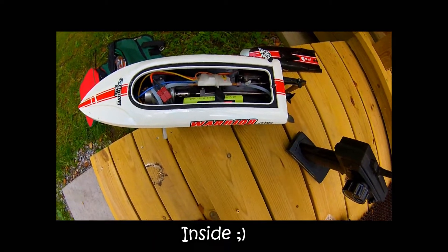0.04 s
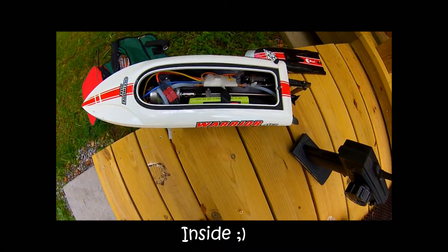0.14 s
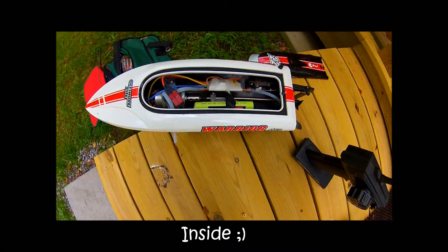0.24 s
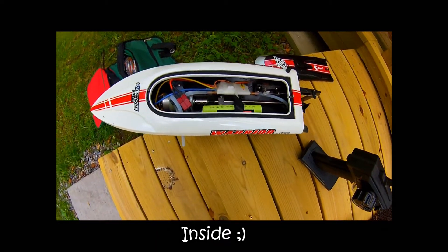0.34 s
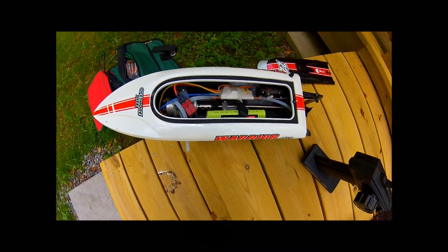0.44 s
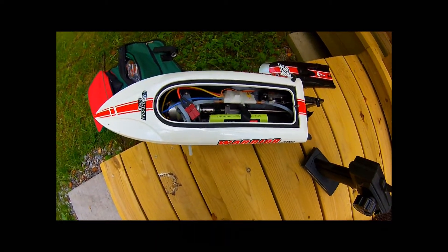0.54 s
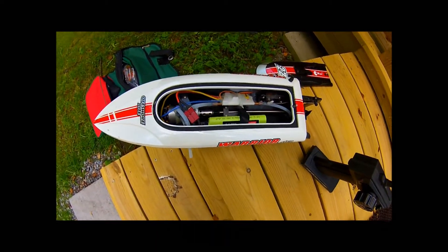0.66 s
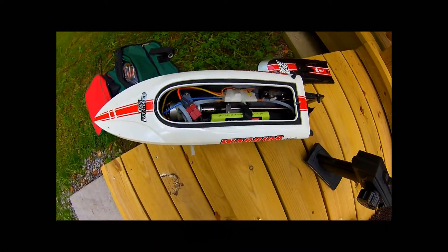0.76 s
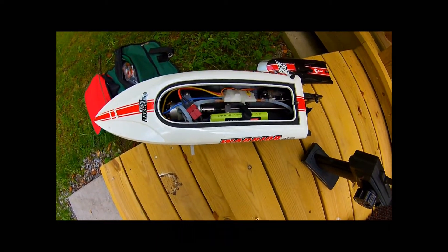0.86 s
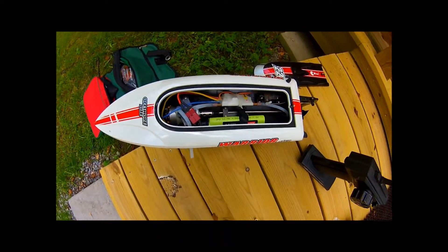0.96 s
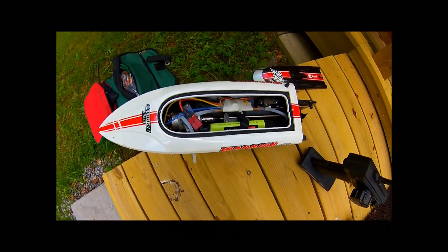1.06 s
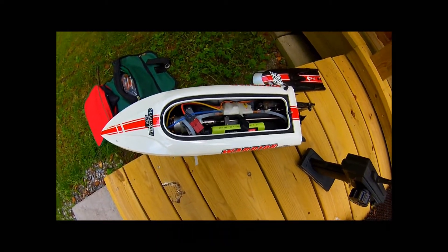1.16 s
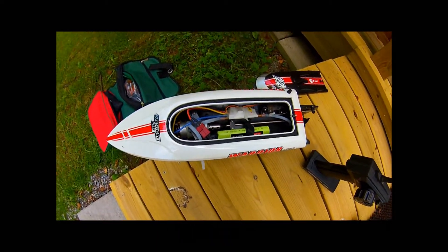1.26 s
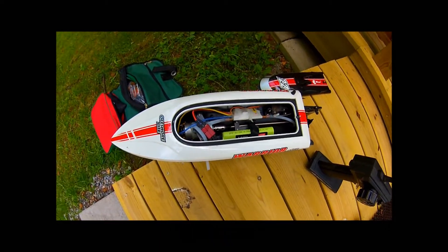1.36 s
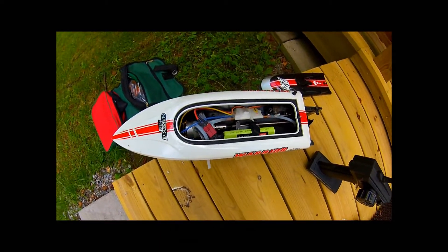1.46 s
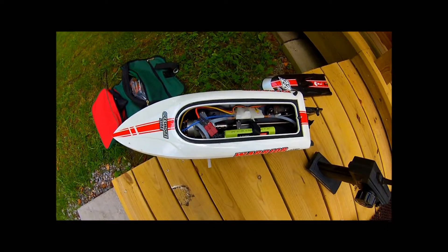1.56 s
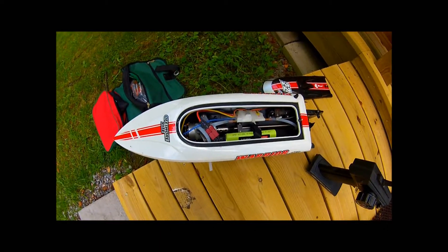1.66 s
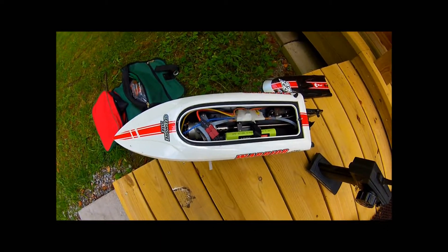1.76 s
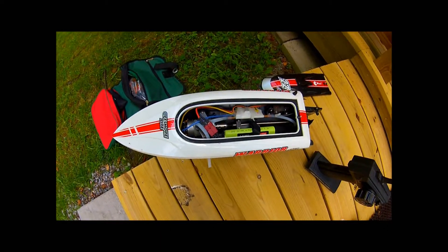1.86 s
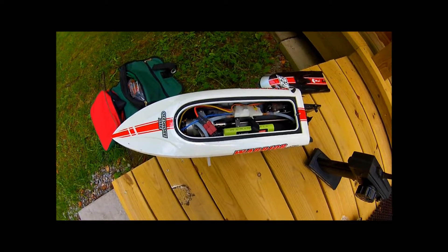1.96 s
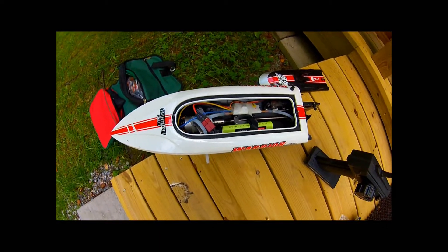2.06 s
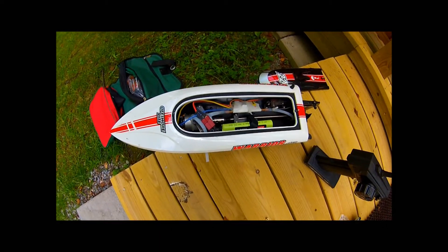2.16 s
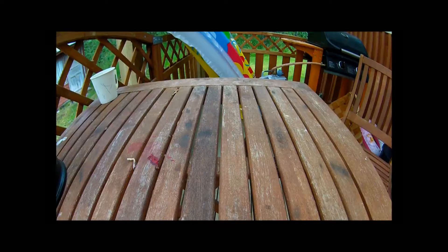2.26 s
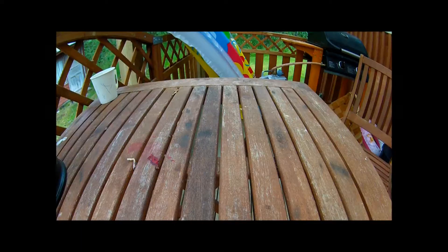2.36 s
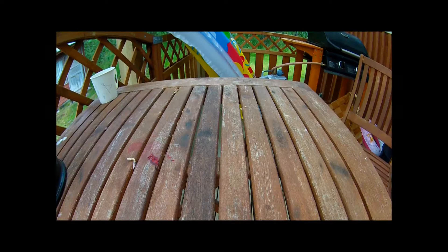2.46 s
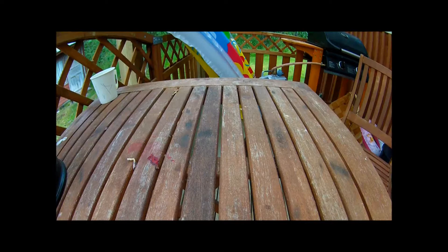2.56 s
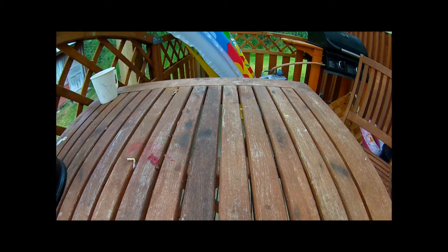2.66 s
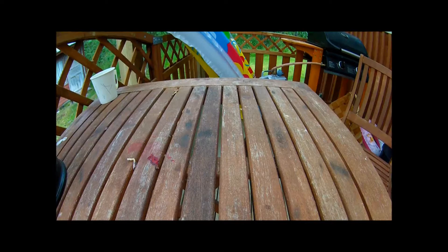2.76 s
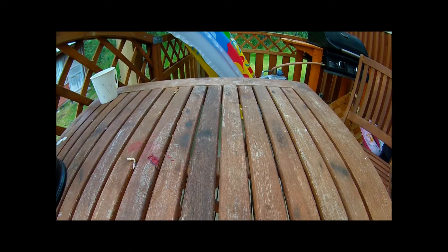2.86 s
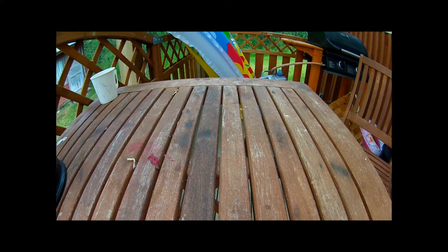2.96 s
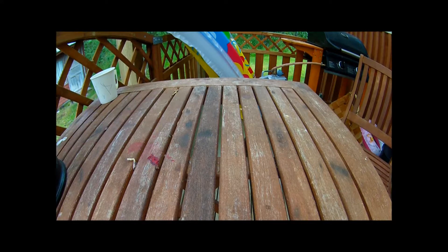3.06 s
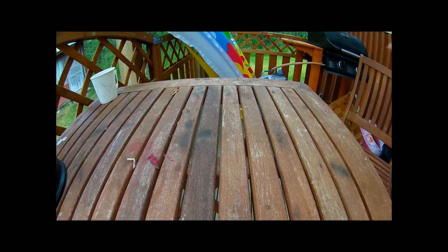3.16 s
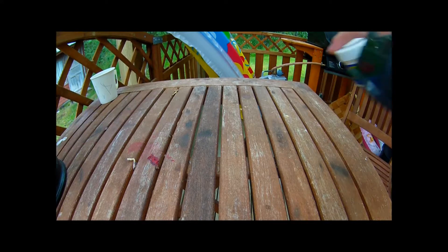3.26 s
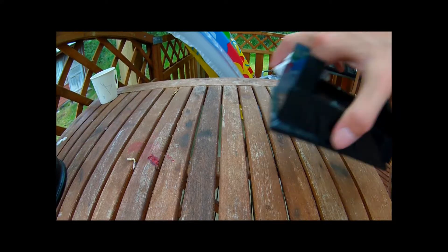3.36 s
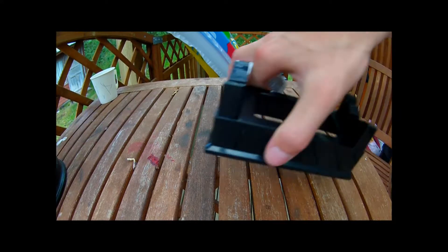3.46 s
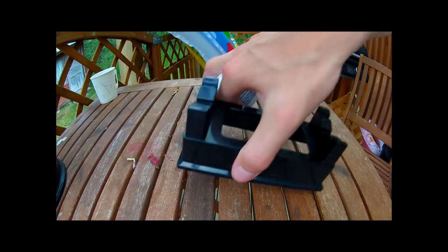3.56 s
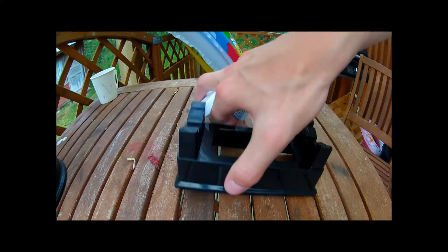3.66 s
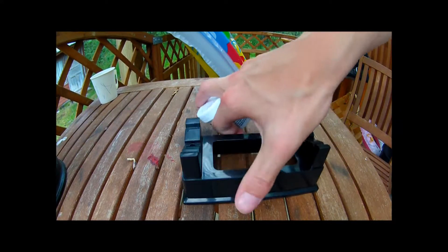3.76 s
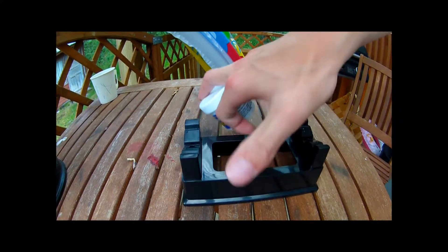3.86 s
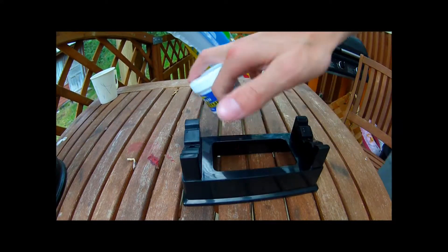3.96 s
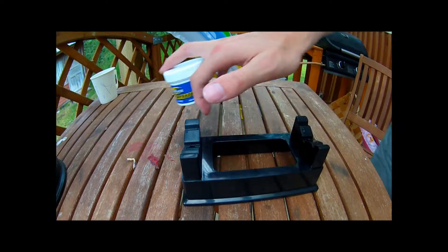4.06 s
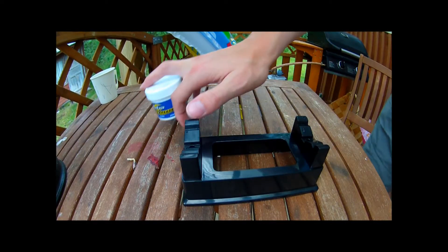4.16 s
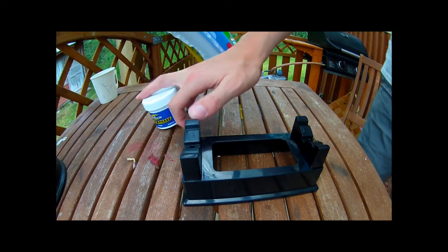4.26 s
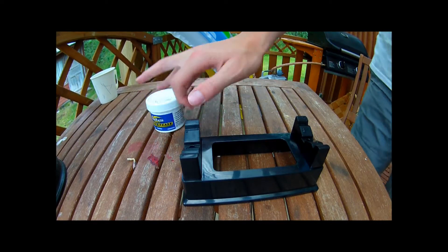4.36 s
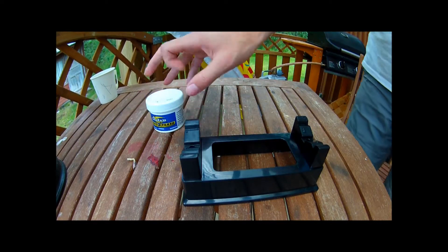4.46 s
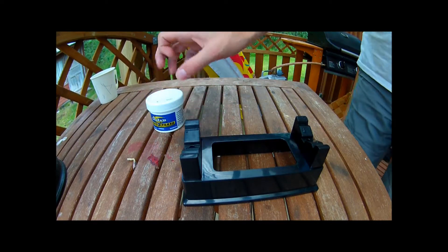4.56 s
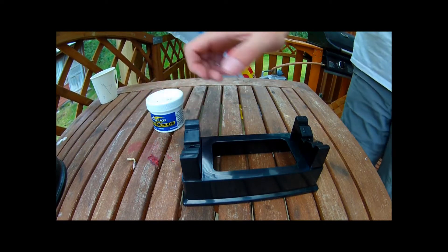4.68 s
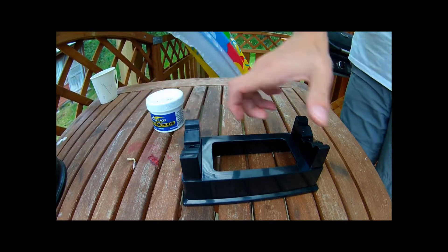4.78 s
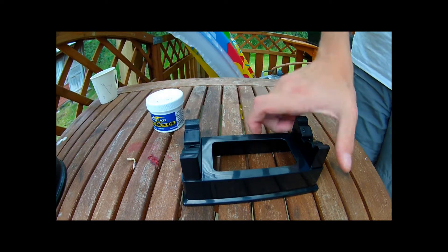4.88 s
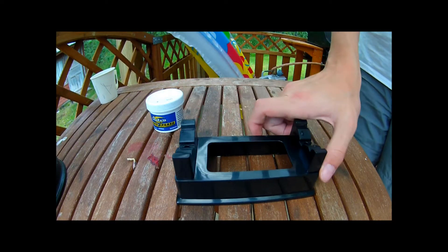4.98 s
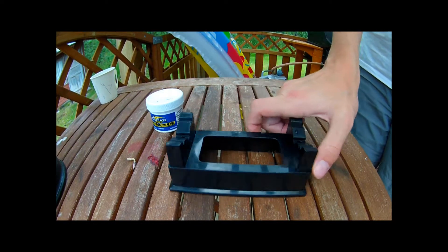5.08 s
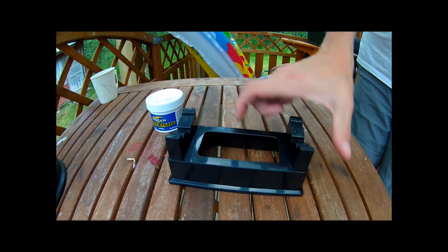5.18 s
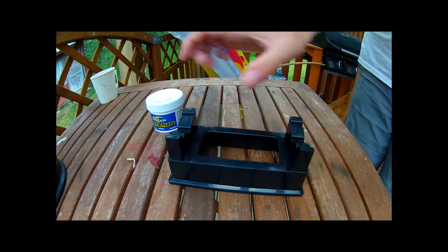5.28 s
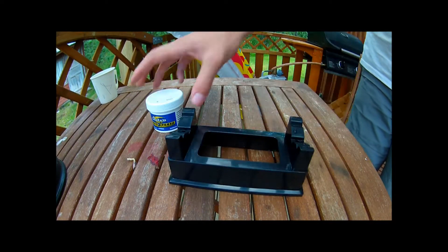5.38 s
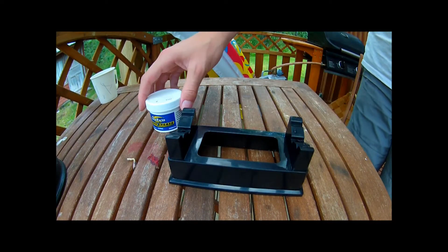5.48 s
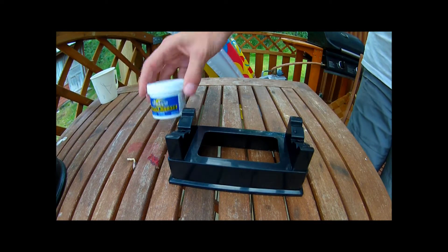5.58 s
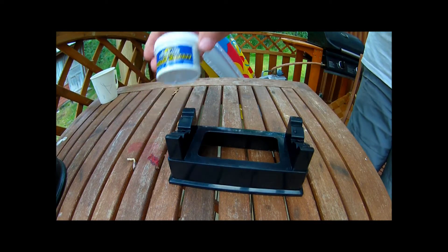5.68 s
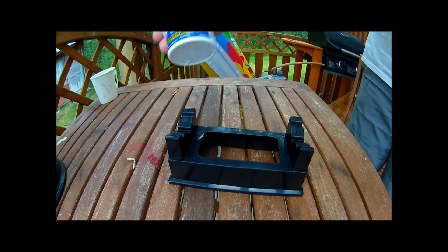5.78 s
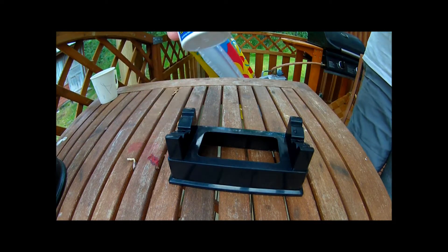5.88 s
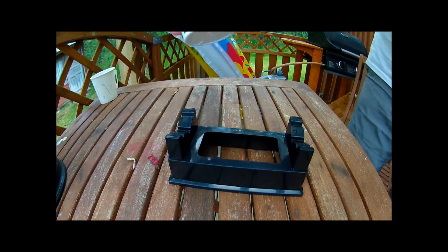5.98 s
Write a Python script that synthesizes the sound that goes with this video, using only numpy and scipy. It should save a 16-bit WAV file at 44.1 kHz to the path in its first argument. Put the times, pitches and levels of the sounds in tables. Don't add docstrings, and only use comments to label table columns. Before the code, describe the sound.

A cheap camera microphone at a deck table hears dull wind and distant traffic with tiny cloth rustles. Its own button clicks faintly, then snaps hard, followed by an instant of silence at a cut. Quiet returns before an empty plastic stand chatters loudly onto wooden slats, a little tub is set down with lighter knocks, and faint fingering and short sliding scrapes fade into open air.

```python
import sys
import numpy as np
from scipy import signal
from scipy.fft import rfft, irfft, next_fast_len
from scipy.io import wavfile
from scipy.ndimage import uniform_filter1d

SR = 44100
rng = np.random.default_rng(int(sys.argv[2]) if len(sys.argv) > 2 else 0)


def store_wav(level_fs):
    pcm = np.round(np.clip(np.atleast_2d(level_fs), -1, 1) * 32767)
    wavfile.write(sys.argv[1], SR, pcm.T.astype(np.int16))


def boost(x):
    u = np.asarray(x, float) / 20
    return 10 ** u


N = 265702
TIME = np.arange(N) / SR


def shaped(db_of_hz, channels):
    size = next_fast_len(N)
    hz = np.maximum(np.fft.rfftfreq(size, 1 / SR), 1)
    f, db = np.transpose(db_of_hz)
    gain = boost(np.interp(np.log(hz), np.log(f), db))
    spectrum = rfft(rng.standard_normal((channels, size)))
    x = irfft(spectrum * gain, size)[:, :N]
    return x / x.std()


def band(x, lo_hz, hi_hz):
    return signal.sosfilt(signal.butter(2, [lo_hz, hi_hz], "bandpass", fs=SR, output="sos"), x)


def walk(rate):
    hold = int(SR / rate)
    x = np.repeat(rng.standard_normal(N // hold + 1), hold)
    x = uniform_filter1d(uniform_filter1d(x, hold), hold)[:N]
    return x / x.std()


def add(out, s, y):
    i = int(s * SR)
    out[i:i + len(y)] += y[:N - i]


def ring(modes, scatter_db, detune, dense_db, dense_t60):
    hz, db, t60 = np.transpose(modes)[:, :, None]
    t = TIME[:SR // 6]
    chance = rng.standard_normal((2, len(hz), 1))
    polarity = (-1.) ** np.arange(len(hz))[:, None]
    decay = boost(db + scatter_db * chance[0] - 60 * t / t60)
    tones = np.sin(2 * np.pi * hz * (1 + detune * chance[1]) * t)
    y = np.sum(polarity * decay * tones, axis=0)
    blur = rng.standard_normal(len(t)) * boost(-60 * t / dense_t60)
    y = band(y, 0.4 * hz.min(), 1.42 * hz.max())
    blur = band(blur, 0.812 * hz.min(), 1.13 * hz.mean())
    y = y / np.linalg.norm(y) + boost(dense_db) * blur / np.linalg.norm(blur)
    return y / np.linalg.norm(y)


def outdoors():
    # f/Hz, density/dB per Hz
    air_colour = [(6, -3), (15, 6.5), (40, 4.5), (65, -5), (110, -11), (200, -15.5), (400, -21.5),
                  (800, -23.5), (1300, -27), (2000, -32.5), (4000, -33), (5900, -39)]
    # t/s, level/dB
    traffic_course = [(0, 1), (.7, -0.35), (3.5, .3), (4.0, -2.5), (5.0, -2.5), (6.02, -2.5)]
    # start/s, end/s, f/Hz, level/dB
    whines = [(.87, .92, 3400, -57), (3.26, 3.4, 3750, -60.5), (1.2, 1.326, 1495, -55.5),
              (2.225, 2.42, 355, -54.5), (2.227, 2.357, 780, -60), (2.639, 2.843, 360, -52),
              (2.607, 2.72, 717, -58), (2.78, 2.86, 720, -56), (2.969, 3.324, 290, -56.5),
              (3.006, 3.21, 900, -63), (2.994, 3.25, 880, -57), (3.45, 3.625, 420, -58)]
    base_db = (-49, -56 + np.interp(TIME, *np.transpose(traffic_course)), -65)
    lo_edges_hz, hi_edges_hz = (6, 130, 1500), (130, 1500, 7000)
    raise_db, flickers_db, rates_hz = (8, 3.0, 2.5), (2.5, 1.2, .8), (9, 12, 20)
    swell, out = walk(1.0), 0
    layers = zip(shaped(air_colour, channels=3), base_db, lo_edges_hz, hi_edges_hz,
                 raise_db, flickers_db, rates_hz)
    for air, db, lo_hz, hi_hz, above_db, flicker_db, rate in layers:
        layer = band(air, lo_hz, hi_hz)
        wander_db = 0.58 * swell + flicker_db * walk(rate)
        out = out + layer / layer.std() * boost(db + above_db + wander_db)
    waver = walk(15) + 0.1 * walk(400)
    for start, end, hz, db in whines:
        t = TIME[:int((end - start) * SR)]
        bend = 2.02 * hz / 350 * waver[int(start * SR):][:len(t)]
        whine = np.sqrt(np.hanning(len(t))) * np.sin(2 * np.pi * hz * t + bend)
        add(out, start, boost(db) * whine)
    return out


def rustles():
    # t/s, peak/dB, rise/ms, length/ms
    puffs = [(.1, -47.5, 31, 75), (.369, -60, 4, 18), (.565, -49, 9, 20), (1.168, -47.5, 11, 51),
             (1.26, -46.5, 24, 52), (2.517, -40, 3.0, 25), (2.812, -45.5, 3.7, 17), (3.084, -43, 6.5, 26),
             (3.257, -47, 24, 110), (5.257, -49.5, 3.7, 29), (5.649, -54, 4.6, 14)]
    # f/Hz, density/dB per Hz
    cloth_colour = [(120, -30), (200, -10), (773, -1.5), (927, -4), (1370, -4), (1740, -12), (3740, -11),
                    (5600, -19.5), (7280, -55), (12300, -120)]
    envelope, t = np.zeros(N), TIME[:SR // 3]
    for s, db, rise_ms, length_ms in puffs:
        puff = np.minimum(1000 * t / rise_ms, 1) * np.exp(-1000 * t / length_ms)
        add(envelope, s, boost(db - 6) * puff)
    crackle = boost(2.5 * walk(300))
    return envelope * crackle * shaped(cloth_colour, channels=1)[0]


def button():
    # f/Hz, level/dB, t60/s
    case_modes = [(560, -0.5, .018), (800, -11, 0.013), (1225, -1, 0.014), (1515, -3, 0.018),
                  (1835, -6.5, 0.0088), (2140, -7, 0.014), (2457, -5, 0.014), (3110, -22.5, 0.049),
                  (3870, -14.5, 0.0041), (4740, 4.5, 0.0068)]
    # t/s, peak/dB, push/ms
    snaps = [
        (1.9214, -23, 0.22),
        (1.9250, -19.5, 0.2),
        (2.0225, -30.5, 0.26),
        (2.0256, 0, .3),
        (2.0266, 5.5, .08),
    ]
    out = np.zeros(N)
    for s, db, push_ms in snaps:
        push = np.hanning(int(push_ms * SR / 1000) + 3)
        y = np.convolve(push, ring(case_modes, scatter_db=1.3, detune=0.012, dense_db=-2.0, dense_t60=0.014))
        add(out, s, y * boost(db) / np.abs(y).max())
    return out


def taps():
    # t/s, f/Hz, peak/dB, push/ms, t60/s
    soft_contacts = [(2.0231, 110, -12, 3.1, 0.013), (4.195, 227, -35, 4, .04),
                     (4.218, 217, -18.5, 4, 0.061), (4.363, 1400, -21.5, 3.4, 0.078),
                     (4.402, 1400, -19, 1.7, 0.062), (4.364, 2356, -25, 1.5, 0.056),
                     (4.216, 2855, -16, 0.94, 0.014), (4.196, 770, -26, 2.6, 0.04),
                     (4.596, 1135, -33, 4.9, 0.081), (4.63, 1138, -44, 38, 0.17),
                     (4.768, 1170, -38.5, 2.2, 0.22), (4.778, 715, -40.5, 14, 0.13),
                     (4.861, 1300, -41, 4, 0.12), (4.919, 669, -25, 12, 0.043),
                     (4.961, 658.5, -22, 6.9, 0.11), (4.963, 476, -32.5, 3, 0.48),
                     (5.50, 677, -56, 5.9, 0.083)]
    # t/s, f/Hz, peak/dB
    table_thuds = [(3.625, 89, -23), (3.711, 72.7, -19), (3.75, 113, -23), (4.217, 87.5, -22),
                   (4.364, 92, -24), (4.411, 70, -24.5)]
    thud_push_ms, thud_t60_s = 5.3, 0.17
    out, t = np.zeros(N), TIME[:SR // 4]
    for s, hz, db, push_ms, t60 in soft_contacts + [(*thud, thud_push_ms, thud_t60_s) for thud in table_thuds]:
        rise = np.sin(np.pi / 2 * np.minimum(1000 * t / push_ms, 1))
        fall = boost(-60 * np.maximum(t - push_ms / 1000, 0) / t60)
        wobble = 0.58 * np.sin(2 * np.pi * 45 * t + rng.random() * 2 * np.pi)
        add(out, s, boost(db) * rise * fall * np.sin(2 * np.pi * hz * t + wobble))
    return out


def parts():
    # f/Hz, level/dB, t60/s
    slats = [(201, -6.5, 0.013), (266.6, -7.5, 0.08), (326, -4, 0.08), (405, -4, 0.07), (482, 6.5, 0.047),
             (552, -6, 0.058)]
    stand_floor = [(613, -5.5, 0.042), (685, 11, 0.045), (772, -8.5, 0.11)]
    stand_walls = [(892, -9, 0.07), (913, -5, .05), (1077.5, 3.5, 0.072), (1151, 2.5, 0.046),
                   (1248, -2.5, 0.098), (1400, 6.5, 0.038)]
    stand_rim = [(1560, -15, 0.016), (1733, 6.5, 0.03), (2050, 2, 0.021), (2340, -12, .03),
                 (2398, 3.5, 0.031), (2586, 12, 0.031), (2920, 8.5, 0.03), (3400, -9, 0.032),
                 (3686, 4.5, 0.014), (4200, -35, .02), (4420, -32.5, 0.014)]
    return [slats, stand_floor, stand_walls, stand_rim]


def rubbing_db(part):
    # t/s, length/s, level/dB, brightness/dB per part, easing of pressure/dB
    weight_rubs = [(3.624, 0.045, -17.5, 2, 26), (3.674, 0.025, -23.5, -4, 19.5), (3.711, 0.053, -18, 3, 2),
                   (3.779, 0.035, -22, 1, 8), (4.149, 0.026, -51.5, -6.5, 16), (4.182, 0.022, -46, -1.5, 0),
                   (4.216, 0.038, -23, -3, 16), (4.315, 0.035, -53.5, -5, -4), (4.363, .035, -24, -5.5, 10),
                   (4.402, 0.029, -27, -6, 6), (4.93, .04, -49.5, -4, -5), (4.965, 0.044, -46, -2, 0),
                   (5.006, 0.1, -47, -2.5, -10), (5.096, 0.087, -39, 2, 12), (5.19, 0.018, -51, -14.5, 32),
                   (5.27, 0.026, -64.5, -9, 7)]
    finger_rubs = [(3.604, 0.013, -48, -3.5, 3.3), (4.597, 0.12, -45, -4.5, 11),
                   (4.768, 0.046, -44, 2.5, 11.3), (4.862, 0.032, -46, 6, 6.1), (5.44, 0.013, -62, -5, 4),
                   (5.5, 0.041, -52.5, -11.5, 7.1), (5.635, 0.015, -58, -10, 3.6)]
    # colour/dB under weight, colour/dB under fingers
    weight_colour_db = [-1.7, 1.4, 2, -1.03]
    finger_colour_db = [-16.5, -5.5, 1.5, -22]
    # share of the easing (stiff parts follow the pressure most), release/dB per s
    easing_share = [0.28, 0.29, 0.87, 1.13]
    release = [420, 470, 510, 520]
    grip_db_per_s = 25000
    db = np.full(N, -200.)
    for rows, colour_db in ((weight_rubs, weight_colour_db), (finger_rubs, finger_colour_db)):
        for s, length, level_db, bright_db, ease_db in rows:
            t = TIME - s
            tilt_db = bright_db * (2 * part - 3) / 2
            eased_db = ease_db * easing_share[part] * np.clip(t / length, 0, 1)
            held_db = level_db + colour_db[part] + tilt_db - eased_db
            grip_db = grip_db_per_s * np.minimum(t, 0)
            let_go_db = release[part] * np.maximum(t - length, 0)
            db = np.maximum(db, held_db + grip_db - let_go_db)
    return db


def slides():
    hits = rng.random(N) < 6000 / SR
    grains = hits * rng.standard_normal(N) * boost(1.37 * rng.exponential(size=N))
    grains = grains * boost(1.3 * walk(120))
    out = 0
    for k, (modes, dense_db) in enumerate(zip(parts(), (-2.0, -2.5, -7, 0.5))):
        force = grains / grains.std() * boost(rubbing_db(k) - 2.0)
        body = ring(modes, scatter_db=1.0, detune=0, dense_db=dense_db, dense_t60=0.0077)
        out = out + signal.fftconvolve(force, body)[:N]
    scratch = band(force, 1600, 4650)
    return out + boost(-7.5) * scratch


def knocks():
    # t/s, peak/dB, slats/dB against the peak, hardness/dB (rim up and stand floor down)
    landings = [(3.626, 1.5, -26.5, 1.5), (3.712, -3.5, -14.5, 6.5), (3.729, -1.5, -14.5, 3),
                (3.758, -5.5, -8.5, -2), (3.791, -6.5, -18, 3), (4.148, -37, 1, -9), (4.18, -31, -11, 2),
                (4.215, -6.5, -7, 2.5), (4.235, -16, -11, -7), (4.362, -14.5, -9, -6),
                (4.401, -14, -29, -7), (4.429, -20.5, -4, -5), (4.597, -42.5, -30, -6),
                (4.77, -40, -15.5, -4), (4.862, -39, -19, 4), (4.962, -25.5, -15, -16)]
    stand_db = [-12.5, -10.5, -13.5]
    chatters_s = (0.0095, 0.0099, 0.0033, 0.0038)
    out, t = np.zeros(N), TIME[:SR // 20]
    for s, peak_db, slats_db, hard_db in landings:
        part_db = [slats_db, stand_db[0] - hard_db / 2, stand_db[1], stand_db[2] + hard_db]
        for modes, db, chatter_s in zip(parts(), part_db, chatters_s):
            force = rng.standard_normal(len(t)) * np.exp(-t / chatter_s)
            force[0] += 9.0
            body = ring(modes, scatter_db=2.5, detune=0.017, dense_db=-1.5, dense_t60=6 * chatter_s)
            y = signal.fftconvolve(force, body)
            add(out, s, y * boost(peak_db + db + 3.0) / np.abs(y).max())
        crack = band(force * np.exp(-t / .0012), 2800, 5720)
        add(out, s, crack * boost(peak_db + 1.8 * hard_db - 19) / np.abs(crack).max())
    return out


def scene():
    mono = outdoors() + rustles() + button() + taps() + slides() + knocks()
    return np.array([mono, mono])


def low_pass(x):
    return signal.sosfilt(signal.butter(12, 16410, fs=SR, output="sos"), x)


def record(dry):
    # f/Hz, density/dB per Hz
    input_hiss = [(60, 6.5), (300, 0), (1000, -7), (5200, -10.5), (5800, -31.5), (6300, -25), (6800, -15),
                  (8200, -16), (8500, -47)]
    left_offset, right_cut_hz, edge_hz, top_hz, hiss_db = .0886, 320, 5860, 15100, -70
    fade_s, silent_s, back_s = 2.176, 2.198, 2.2245
    right = signal.sosfilt(signal.butter(1, right_cut_hz, "highpass", fs=SR, output="sos"), dry[1])
    x = np.clip([dry[0] + left_offset, right], -1, 1)
    x = signal.sosfiltfilt(signal.butter(12, edge_hz, fs=SR, output="sos"), x)
    sampled = signal.resample_poly(x, 40, 147, axis=1, window=("kaiser", 2), padtype="edge")
    held = np.repeat(sampled, 4, axis=1)
    x = signal.resample_poly(held, 147, 160, axis=1, padtype="edge")[:, :N]
    x = x + boost(hiss_db) * shaped(input_hiss, channels=1) * np.array([[1], [-1]])
    x = signal.sosfiltfilt(signal.ellip(9, .05, 45, top_hz, fs=SR, output="sos"), x)
    fade = np.cos(np.pi / 2 * np.clip((TIME - fade_s) / (silent_s - fade_s), 0, 1))
    mix = np.clip(x, -1, 1) * np.where(TIME < back_s, fade, 1)
    return low_pass(mix)


dry = scene()
out = record(dry)
store_wav(out)
```